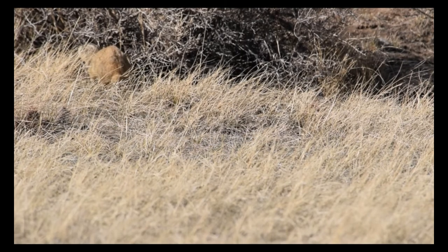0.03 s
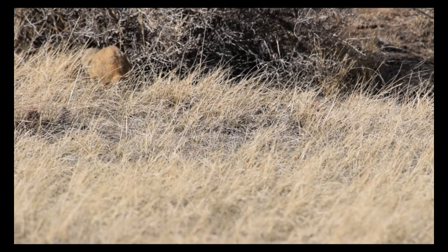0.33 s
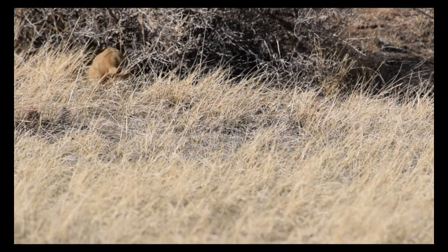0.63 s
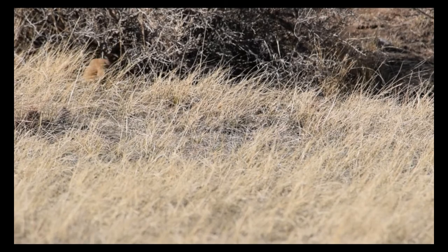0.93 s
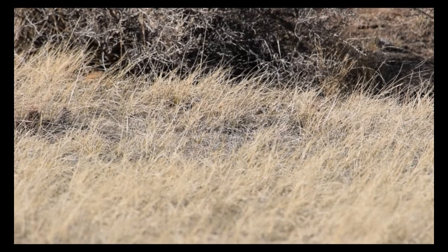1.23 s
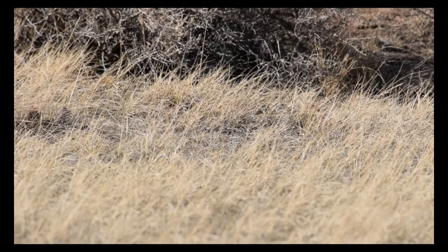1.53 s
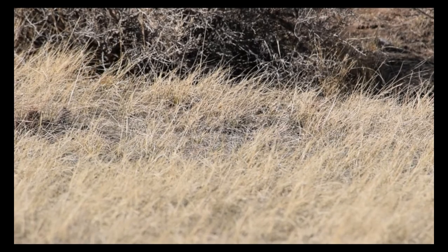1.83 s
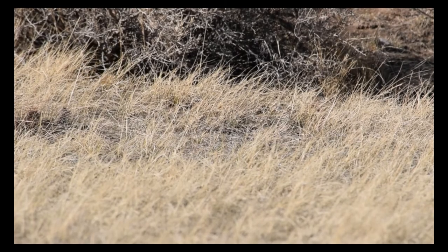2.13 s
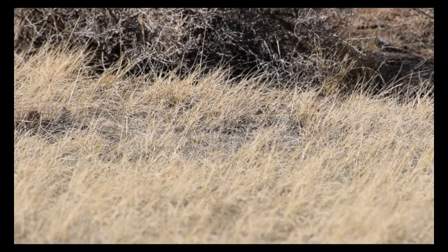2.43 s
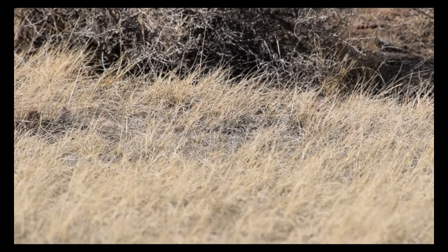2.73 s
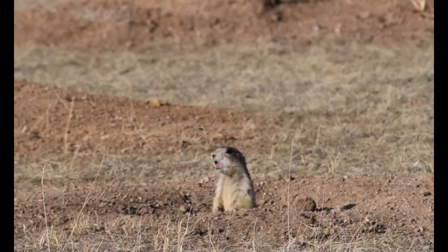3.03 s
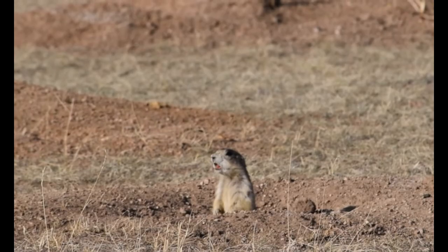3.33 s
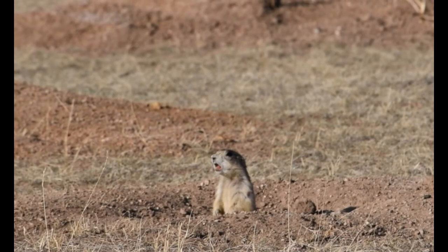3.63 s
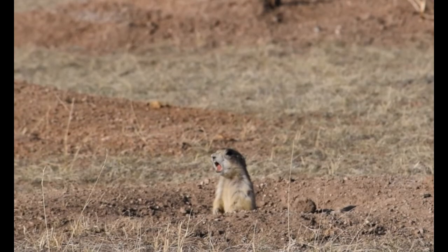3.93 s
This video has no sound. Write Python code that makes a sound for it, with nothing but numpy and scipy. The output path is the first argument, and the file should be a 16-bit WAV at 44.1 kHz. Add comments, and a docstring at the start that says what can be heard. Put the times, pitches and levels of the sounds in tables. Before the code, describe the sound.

A prairie dog's sharp barks stand out against faint, steady wind in open grassland. At first there is only wind and a thin camera whirr and whine, with brief lens motor scrapes from about 0.6 to 1 second. From around 2.9 to 4 seconds the animal gives seven short, high, evenly spaced barks. Soft low bumps touch the microphone as they begin, and a gentle rush of air swells and fades underneath.

```python
"""Faint, steady wind over open grassland, with the thin whirr and whine of a camera. Early on, its lens
motor scrapes briefly. Near three seconds the whirr shifts, soft bumps reach the microphone, and a prairie
dog starts seven short, evenly spaced barks: each is about a dozen sharp pulses that slow down and ring
its throat. A rush of air swells and sinks under the barks, and a thin second tone joins the last two."""
import sys
import numpy as np
from scipy import signal
from scipy.fft import rfft, irfft
from scipy.io import wavfile

SR = 44100
rng = np.random.default_rng(int(sys.argv[2]) if len(sys.argv) > 2 else 0)


def inscribe(sig):
    """Save sig as 16-bit PCM at rate SR to the path in sys.argv[1].

    A 1-D sig is mono; a 2-D sig holds one channel per row.
    Samples are clipped to [-1, 1] before scaling.
    """
    pcm = np.round(np.clip(np.atleast_2d(sig).T, -1, 1) * 32767)
    wavfile.write(sys.argv[1], SR, pcm.astype(np.int16))


N = 176400


def amp(db):
    """Decibels to gain."""
    return 10 ** (np.asarray(db) / 20)


def unit(x):
    """Scales to an rms of one."""
    return x / np.sqrt(np.mean(x ** 2) + 1e-20)


def curve(points, hz):
    """Interpolates a spectrum table on a log-frequency axis."""
    point_hz, value = np.transpose(sorted(points))
    return np.interp(np.log(hz + 1), np.log(point_hz + 1), value)


def add(mix, start_s, sound):
    """Lays a sound into the mix."""
    part = mix[round(start_s * SR):][:len(sound)]
    part += sound[:len(part)]


def noise(gain, likeness):
    """Stereo noise of a given spectrum and left-right likeness."""
    left, other = rfft(rng.standard_normal((2, N)))
    right = likeness * left + np.sqrt(1 - likeness ** 2) * other
    return unit(irfft(np.array([left, right]) * gain, N))


def bins():
    """Frequencies of the full-length spectrum."""
    return np.fft.rfftfreq(N, 1 / SR)


def hump(hz, width_hz):
    """Gain curve of a resonance."""
    return 1 / (1 + (2 * (bins() - hz) / width_hz) ** 2)


def pan(db):
    """Gains for a left-minus-right level."""
    return amp([[db / 2], [-db / 2]])


def wind(level_db=-60, waver_db=0.54):
    """A bed of distant air and hiss that wavers slightly."""
    # colour of the wind: freq_hz, relative_db
    colour = [(6, 14.5), (25, -3), (45, -3), (90, -4), (200, -10), (330, -12.5), (470, -5.5), (650, -6),
              (950, -3.5), (1600, -4), (2600, -6.5), (3500, -11.5), (4800, -12), (7000, -15), (10000, -20),
              (15000, -25.5)]
    # stereo image: freq_hz, likeness (0 wide, 1 mono)
    image = [(60, 0.94), (130, 0.12), (300, 0.55), (640, 0.66), (1400, 0.26), (3100, 0.1), (7000, 0.11),
             (15000, 0)]
    waver = amp(waver_db * noise(hump(6, 29), likeness=0.96))
    return amp(level_db) * waver * noise(amp(curve(colour, bins())), curve(image, bins()))


def camera(shift_s=2.9, whine_hz=15700, whine_left_db=-91, whine_right_db=-77.5):
    """A steady whirr in narrow resonances, which shifts once, and a thin electronic whine."""
    # whirr resonances: centre_hz, width_hz, level_db, pan_db, shift_db
    resonances = [(3120, 290, -78.5, 13, 4), (3450, 240, -83.5, -21, 0), (3755, 106, -69, 4, 3),
                  (3930, 240, -75, 4, 1.5), (4320, 240, -72.5, -1, -14)]
    t = np.arange(N) / SR
    shifted = t > shift_s
    whirr = sum(amp(db + shift_db * shifted) * pan(pan_db) * noise(hump(hz, width_hz), likeness=0.74)
                for hz, width_hz, db, pan_db, shift_db in resonances)
    whine = np.sqrt(2) * np.sin(2 * np.pi * whine_hz * t)
    return whirr + amp([[whine_left_db], [whine_right_db]]) * whine


def lens_motor(decay_s=0.005, squeak_hz=3940, wander_hz=99.5, squeak_share=0.27, grains_per_s=1500):
    """Short scrapes that crackle, ring the lens barrel and partly catch in a wavering squeak."""
    # motor scrapes: start_s, length_s, level_db, relative_grit_db
    scrapes = [(0.566, 0.016, -55, -9), (0.578, 0.02, -54, -11), (0.599, 0.026, -52, -15),
               (0.624, 0.019, -59, -13), (0.652, 0.047, -59, -10), (0.688, 0.028, -60.5, -7),
               (0.708, .006, -50.5, -18), (0.7786, 0.0038, -47.5, -17), (0.792, 0.0043, -48, -17),
               (0.828, 0.034, -65.5, -19), (0.956, 0.011, -58.5, -11), (0.992, 0.016, -58, -6.5)]
    # barrel resonances: centre_hz, width_hz, relative_db
    modes = [(2120, 110, -12), (2910, 310, -11.5), (3850, 170, -1), (4100, 650, -9), (5480, 140, -14.5)]
    push, grit = np.zeros((2, N))
    for start_s, length_s, level_db, grit_db in scrapes:
        stroke = amp(level_db) * signal.windows.tukey(int(length_s * SR), .3)
        add(push, start_s, stroke)
        add(grit, start_s, amp(grit_db) * stroke)
    pole = np.exp(-1 / (decay_s * SR))
    envelope = signal.lfilter([1 - pole], [1, -pole], push)
    barrel = unit(sum(amp(db) * noise(hump(hz, width_hz), likeness=0.97) for hz, width_hz, db in modes))
    pitch_hz = squeak_hz + wander_hz * noise(hump(59, 280), likeness=1)[0]
    squeak = unit(np.sin(2 * np.pi * np.cumsum(pitch_hz) / SR))
    body = np.sqrt(1 - squeak_share) * barrel + np.sqrt(squeak_share) * squeak
    grains = rng.standard_normal((2, N)) * (rng.random(N) < grains_per_s / SR)
    crackle = unit(irfft(rfft(grains) * hump(hz=4400, width_hz=7000), N))
    roughness = amp(db=1.2 * noise(hump(150, 300), likeness=1))
    return pan(db=1.0) * roughness * (envelope * body + grit * crackle)


def dull_noise(cutoff_hz, spread=0.69):
    """A short stretch of low-passed noise, partly alike in both channels."""
    lowpass = signal.butter(4, cutoff_hz, fs=SR, output="sos")
    shared, *sides = signal.sosfilt(lowpass, rng.standard_normal((3, SR // 10)))
    return unit(shared + spread * np.array(sides))


def bumps(lead_s=.03, width_cycles=0.35, knock_s=0.0034):
    """Each microphone bump is a low, fluttering push and pull with a crackly knock at its height."""
    # bumps: peak_s, level_db, pitch_hz, relative_knock_db
    hits = [(2.9071, -45, 400, 1.5), (2.9187, -36.5, 152, -4), (2.937, -39.5, 112, -10.5),
            (2.96, -45, 135, -7), (3.0038, -36, 215, -15), (3.012, -39.5, 125, -18), (3.028, -41, 135, -15),
            (3.038, -54, 220, 2), (3.053, -43.5, 167, -17), (3.061, -44, 170, -17),
            (3.072, -39, 175, -15.5), (3.12, -43.5, 121, -34), (3.133, -46.5, 100, -25),
            (3.18, -49, 103, -28), (3.31, -53, 104, -25), (3.355, -48, 98, -28), (3.369, -48, 130, -15),
            (3.383, -52, 130, -24), (3.424, -43.5, 91, -30), (3.661, -57, 163, -25),
            (3.8473, -44.5, 143, -25)]
    t = np.arange(SR // 10) / SR - lead_s
    mix = np.zeros((2, N))
    for peak_s, level_db, pitch_hz, knock_db in hits:
        flutter = 0.36 * dull_noise(cutoff_hz=2.23 * pitch_hz)
        swing = (flutter - np.sin(2 * np.pi * pitch_hz * t)) / np.cosh(pitch_hz * t / width_cycles)
        knock = amp(knock_db) * np.exp(-(t / knock_s) ** 2) * dull_noise(cutoff_hz=544)
        for channel, sound in zip(mix, amp(level_db) * (swing + knock)):
            add(channel, peak_s - lead_s, sound)
    return mix


def bark(level_db, pitch_hz, sag_hz_per_s, treble_db, length_s=.026, attack_s=0.00074, hold_s=0.011):
    """A burst of pulses that slows, fades and dulls as the mouth shuts, with a little rasp."""
    fade_db_per_s, dulling_db_per_s = 702, 110
    jitter_s, shimmer_db, rasp_db, max_pulses = .00002, -1.5, -29, 20
    t = np.arange(int(length_s * SR)) / SR
    effort = amp(level_db - 4 * np.exp(-t / attack_s) - fade_db_per_s * np.maximum(t - hold_s, 0))
    cycles = np.cumsum(pitch_hz - sag_hz_per_s * t) / SR
    jitter, shimmer = rng.standard_normal((2, max_pulses))
    pulse_s = np.interp(np.arange(max_pulses), cycles, t, right=1) + jitter_s * abs(jitter)
    pulses = amp(shimmer_db * shimmer) @ np.sinc((t - pulse_s[:, None]) * SR)
    rasp = amp(rasp_db) * rng.standard_normal(SR // 10)[:len(t)]
    drive = effort * (pulses + rasp)
    treble = np.convolve(drive, signal.firwin(31, cutoff=5500, pass_zero=False, fs=SR), "same")
    treble_gain = amp(treble_db - dulling_db_per_s * (t - hold_s))
    return drive + treble * (treble_gain - 1)


def throat(mouth, size=2048):
    """The answer to one pulse: a sharp snap and a few short rings, all tuned by the set of the mouth."""
    # colour of the snap: freq_hz, relative_db
    colour = [(150, -2), (450, -11), (800, -19), (1400, -20), (1850, -16.5), (2200, 3.5), (2850, -3.5),
              (3250, -0.5), (3750, -0.5), (4300, 0), (4900, -6), (5500, -6.5), (6050, -17.5), (6750, -6.5),
              (8000, -6.5), (9200, -11.5), (10200, -17), (11200, -19.5), (12200, -33), (16000, -54.5)]
    # resonances that ring on between pulses: freq_hz, t60_s, relative_db
    rings = [(2200, .016, -48), (3210, 0.024, -25.5), (4130, .014, -30), (7900, .008, -35)]
    tuned = [(hz * mouth, db) for hz, db in colour]
    log_gain = np.log(amp(curve(tuned, abs(np.fft.fftfreq(size, 1 / SR)))))
    snap = np.fft.ifft(np.exp(np.conj(signal.hilbert(log_gain)))).real  # minimum phase: a hard attack
    t = np.arange(size) / SR
    ringing = sum(amp(db - 60 * t / t60_s) * np.cos(2 * np.pi * hz * mouth * t) for hz, t60_s, db in rings)
    return snap / abs(snap).max() + ringing


def echoes(sound, t60_s, gap_s=.0004):
    """Diffuse stereo reflections that die away."""
    t = np.arange(SR // 2) / SR
    tail = rng.standard_normal((2, len(t))) * amp(-60 * t / t60_s) * (t > gap_s)
    tail /= np.linalg.norm(tail, axis=1, keepdims=True)
    return signal.fftconvolve(sound[None], tail, axes=1)[:, :N]


def prairie_dog(puff_s=0.0039, puff_db=-24):
    """A puff of air and then pulses ring the throat; nearby ground and the open field scatter them."""
    # barks: start_s, drive_db, pitch_hz, sag_hz_per_s, treble_db, mouth (throat tuning ratio)
    barks = [(2.9274, -32.5, 553, 8430, 0, .985), (3.107, -31.5, 568, 10550, -2, 1.003),
             (3.28, -31.5, 559, 8960, 1, 0.998), (3.4579, -33, 549, 9000, 2.5, 0.99),
             (3.6216, -32.5, 542, 8740, -0.5, 0.996), (3.7991, -33, 548.6, 9000, 0.5, 1.01),
             (3.9746, -31, 545.5, 9450, -1.5, 1)]
    # second tone under the last two barks: start_s, length_s, level_db
    overtones = [(3.786, .048, -57.5), (3.957, .048, -58.5)]
    voice = np.zeros(N)
    rise = np.linspace(0, 1, int(puff_s * SR))
    for start_s, drive_db, pitch_hz, sag_hz_per_s, treble_db, mouth in barks:
        puff = amp(drive_db + puff_db) * rise * rng.standard_normal(SR // 10)[:len(rise)]
        drive = np.concatenate([puff, bark(drive_db, pitch_hz, sag_hz_per_s, treble_db)])
        add(voice, start_s - puff_s, signal.fftconvolve(drive, throat(mouth)))
    for start_s, length_s, level_db in overtones:
        add(voice, start_s, overtone(length_s, level_db))
    ground = amp(-18) * echoes(voice, t60_s=.025)
    field = amp(-14) * echoes(voice, t60_s=0.4)
    return voice * pan(db=0.37) + ground + field


def air_rush(start_s=3.02, rise_s=0.079, fall_s=0.76, level_db=-59):
    """One soft rush of air that swells quickly and sinks slowly."""
    swell = np.interp(np.arange(N) / SR, start_s + np.cumsum([0, rise_s, fall_s]), [0, 1, 0])
    return amp(level_db) * swell * noise(hump(hz=1150, width_hz=1600), likeness=0.98)


def overtone(length_s, level_db, low_hz=1540, top_hz=1840):
    """A thin second tone in the voice that arches up and down under a bark."""
    arch = np.sin(np.linspace(0, np.pi, int(length_s * SR)))
    pitch_hz = low_hz + (top_hz - low_hz) * arch
    return amp(level_db) * np.sqrt(abs(arch)) * np.sin(2 * np.pi * np.cumsum(pitch_hz) / SR)


def scene():
    """All sources at the microphone."""
    return prairie_dog() + wind() + air_rush() + camera() + lens_motor() + bumps()


def record(dry, cutoff_hz=15850, dc_offset=-.0029):
    """A steep high cut and a small constant offset."""
    lowpass = signal.firwin(1023, cutoff_hz, window=("kaiser", 8), fs=SR)
    return dc_offset + signal.oaconvolve(dry, lowpass[None], "same")


dry = scene()
out = record(dry)
inscribe(out)
```